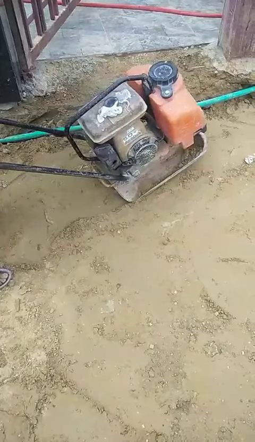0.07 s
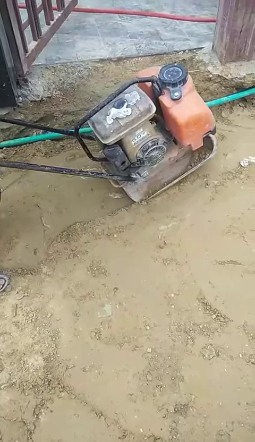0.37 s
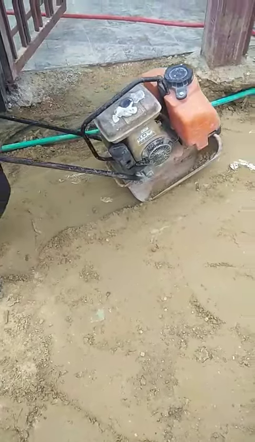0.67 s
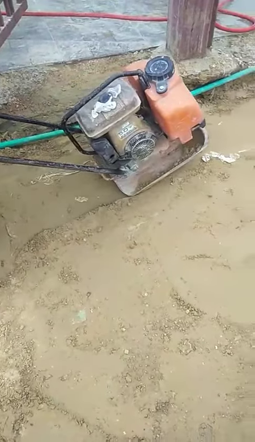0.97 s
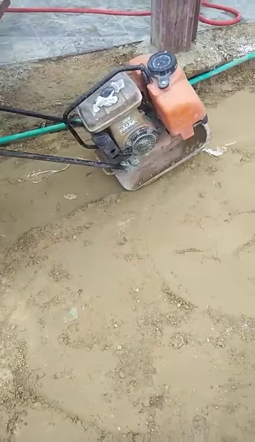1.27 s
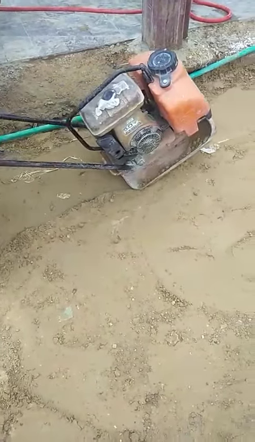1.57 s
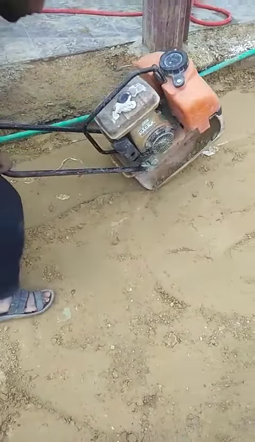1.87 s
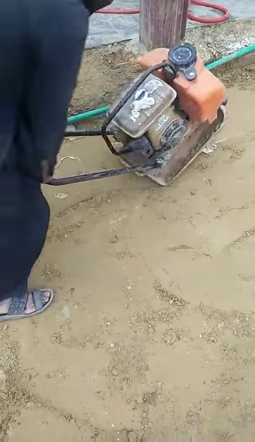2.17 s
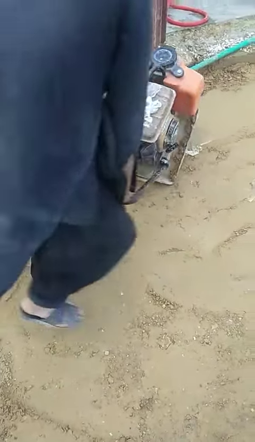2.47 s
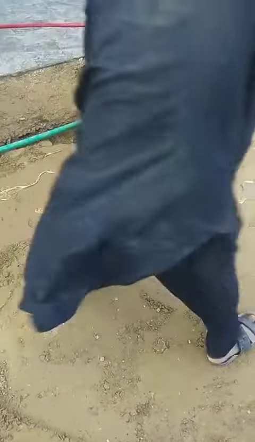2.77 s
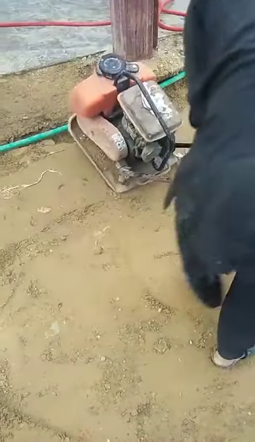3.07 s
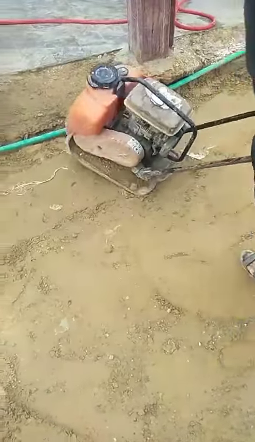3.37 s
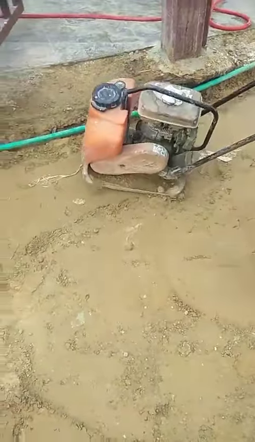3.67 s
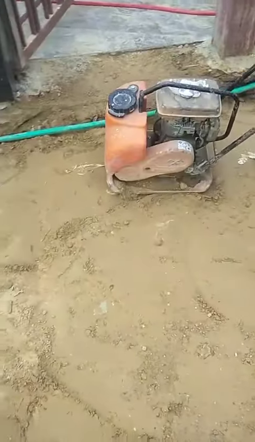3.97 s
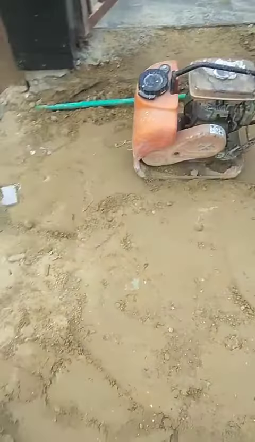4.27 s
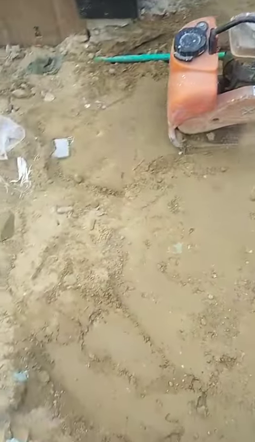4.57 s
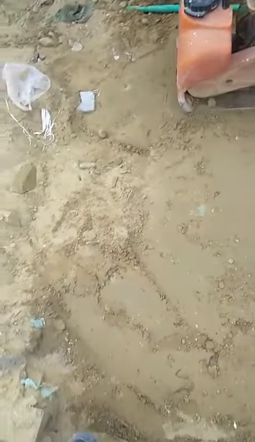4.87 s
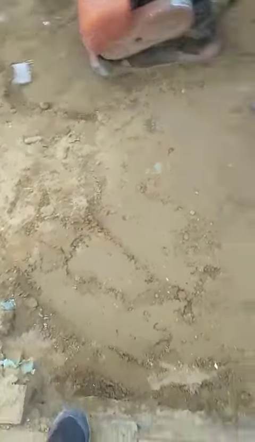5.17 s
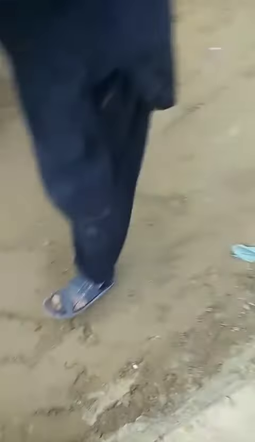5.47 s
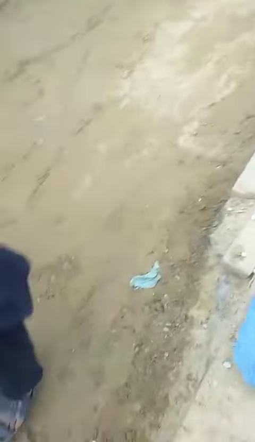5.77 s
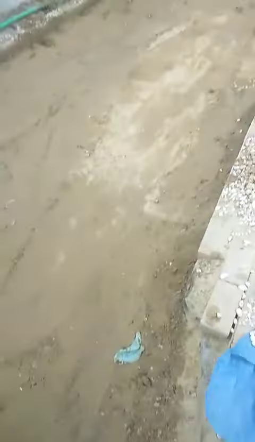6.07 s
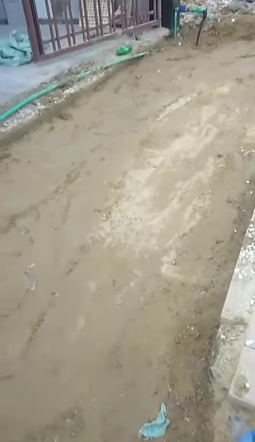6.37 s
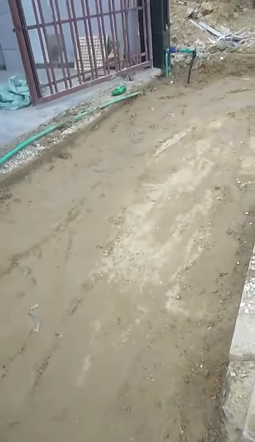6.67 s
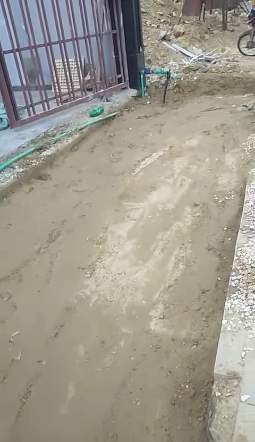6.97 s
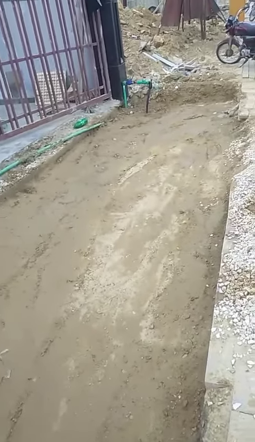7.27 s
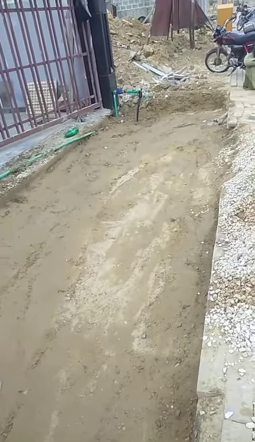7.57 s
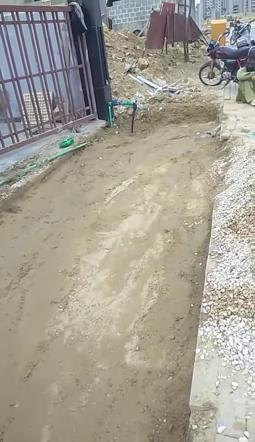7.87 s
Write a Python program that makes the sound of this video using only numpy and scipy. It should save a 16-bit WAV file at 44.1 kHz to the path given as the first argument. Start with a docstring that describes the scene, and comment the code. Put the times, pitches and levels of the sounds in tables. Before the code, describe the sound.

A petrol plate compactor runs loudly for the whole eight seconds, outdoors on damp soil, a few metres from the microphone. Its single-cylinder engine fires in a fast, steady throb, joined by a low hum from the vibrating plate that swells and sinks. The steel frame and guards rattle constantly, with a fine hiss of dancing grit. During the first two seconds the handle clanks quickly and irregularly. Around 2.5 to 3 seconds the treble dulls as someone passes in front. From about 3 to 5 seconds the machine is swung round: the exhaust grows softer, the rattle turns thinner and more ringing, and a loose piece jingles faintly until 4 seconds. The treble dips again between 5 and 6 seconds. Just after 6 seconds the exhaust swells and the handle knocks hard and buzzes, easing by about 7 seconds while the machine keeps running.

```python
"""Plate compactor on damp soil.

A petrol machine works outdoors, a few metres away, and is swung round half way. Its single cylinder
fires about 34 times a second; the belt-driven eccentric shakes the humming plate about 100 times a
second. Every shake rattles the steel frame and guards, whose colour changes with the side that faces
the listener. The handle clanks on its stops; the treble dips as the worker walks past."""
import sys
import numpy as np
from scipy import signal
from scipy.fft import rfft, irfft, next_fast_len
from scipy.io import wavfile
from scipy.ndimage import map_coordinates

SR = 44100
rng = np.random.default_rng(int(sys.argv[2]) if len(sys.argv) > 2 else 0)


def wav_record(signal):
    """Record a signal, one row per channel, as 16-bit PCM in the file named by sys.argv[1]."""
    frames = np.transpose(np.atleast_2d(signal))
    bounded = np.clip(frames, -1, 1)
    # unit amplitude maps onto the largest positive 16-bit level
    quanta = np.round(bounded * 32767).astype(np.int16)
    wavfile.write(sys.argv[1], SR, quanta)


N = 358533

# Engine speed. Each row: time in seconds, firing rate in Hz.
FIRING_HZ = [(0, 33.94), (1.6, 33.54), (2.6, 33.82), (3.5, 33.74), (4.3, 34.62), (5, 34.59), (5.5, 35.52),
             (5.95, 34.57), (7.45, 35.56), (8.13, 34.36)]
# Shaker speed, uneven as the belt slips under load. Each row: time in seconds, rate in Hz.
SHAKER_HZ = [(0, 100.7), (1.8, 99.58), (2.7, 100.82), (3.2, 99.99), (4.45, 101.45), (5.1, 99.59),
             (5.53, 94.63), (5.9, 100.13), (6.2, 98.44), (7.5, 98.32), (8.13, 103.57)]
# Side heard. Each row: time in seconds, weights of front, belt side and rear.
FACING = [(0, 0.67, 0.03, 0.2), (2.6, 0.16, 0.01, 0.095), (3.0, 0.53, 0.21, 0.61), (3.9, 0.14, 0.14, 0.084),
          (5.05, 0.066, 0.65, 0.62), (5.35, 0.37, 0, 0.016), (5.8, 0, 0.26, 0.88), (6.15, 0.22, 0, 1),
          (8.13, 0.048, 0.01, 1)]
# Exhaust as its outlet swings round. Each row: time in seconds, relative level in dB.
EXHAUST_DB = [(0, -27), (2.4, -26), (2.95, -22.5), (3.35, -31.5), (3.72, -30.5), (4.2, -36), (5.2, -34.5),
              (5.5, -30.5), (6.1, -24), (6.7, -29.5), (8.13, -30)]
# Muffler from front, belt side and rear. Each row: frequency in Hz, relative gain in dB.
MUFFLER_FRONT_DB = [(25, -56), (36, -40), (68, -16), (102, -13), (135, -6), (170, 0), (203, 1.5), (238, 2),
                    (305, -3), (338, -5), (372, -19), (405, -15), (440, -7), (473, -24), (506, -12),
                    (540, -14), (610, -23), (700, -18), (1000, -28), (3000, -55)]
MUFFLER_BELT_DB = [(25, -50), (34, -30), (68, -8), (135, -1), (200, 0), (250, -3), (345, -1), (400, -9),
                   (560, -17), (720, -17), (1000, -27), (3000, -52)]
MUFFLER_REAR_DB = [(25, -65), (34, -28), (68, -0.5), (104, -12), (138, -4.5), (174, 9.5), (245, 7.5),
                   (280, -13), (315, -6.5), (350, -3.5), (400, -40), (560, -42), (1000, -29), (3000, -52)]
# Plate hum. Each row: time in seconds, relative level in dB.
HUM_DB = [(0, -24.5), (0.75, -24.5), (1.27, -29.5), (1.7, -22), (2.3, -26), (2.75, -21), (3.0, -22),
          (3.42, -43), (3.69, -26.5), (4.1, -30.5), (4.75, -21), (5.5, -26), (5.89, -21), (6.55, -32.5),
          (7.05, -30.5), (7.7, -24), (7.97, -21.5), (8.13, -23.5)]
# Its second order, as the plate digs in or skates. Each row: time in seconds, level in dB.
OCTAVE_DB = [(0, -34.5), (2.4, -37.5), (2.8, -40), (3.4, -39), (4.3, -51), (4.65, -27.5), (5.1, -25.5),
             (5.45, -37), (5.72, -36), (5.95, -25), (6.4, -43), (6.8, -51), (7.1, -37), (7.45, -27.5),
             (7.75, -29.5), (8.13, -49)]
# Hops on firm soil, landing hard every other shake. Each row: start and end in seconds, level in dB.
HOPS = [(0.33, 0.78, -38), (0.85, 1.85, -35.5), (1.92, 2.55, -35), (2.55, 3.35, -35.5), (3.45, 4.0, -42),
        (4.25, 5.15, -41)]
# Half orders of hopping. Each row: multiple of shaker speed, relative level in dB.
HOP_ORDERS = [(1.5, -2), (2.5, -.5), (3.5, -8), (4.5, -14)]
# Pounded soil. Each row: frequency in Hz, relative gain in dB.
SOIL_DB = [(30, -22), (90, -8), (150, 2), (200, -20), (250, -1), (350, -4), (550, -8), (2000, -54)]
# Engine block and covers. Each row: frequency in Hz, relative gain in dB.
BLOCK_DB = [(30, -36), (90, 0), (200, -3.5), (410, 1.5), (550, -3.5), (720, -3.5), (950, -6.5),
            (1280, -3.5), (1600, -9.5), (2100, -4.5), (2600, -5), (3100, -5), (6000, -23.5), (16000, -58)]
# Frame resonances. Each row: frequency and width in Hz, relative gain in dB.
FRAME_MODES = [(689, 47, 9.1), (903, 80, 2.9), (2130, 27, 3.4), (2480, 13, 2.7), (2860, 29, 1)]
# Rattle of loose steel. Each row: time in seconds, relative level in dB.
RATTLE_DB = [(0, -21), (0.65, -23.5), (1.2, -21.5), (2.0, -22.5), (2.3, -20.5), (2.75, -19), (3.04, -19),
             (3.4, -25), (3.55, -20.5), (3.9, -20), (4.15, -22), (4.45, -20), (4.78, -22), (5.1, -23),
             (5.6, -21), (6.6, -24.5), (7.2, -24), (8.13, -24)]
# That steel from front, belt side and rear. Each row: frequency in Hz, relative gain in dB.
STEEL_FRONT_DB = [(200, -15), (450, -8.5), (1500, -7), (2200, 2.5), (2650, -2), (3200, 7), (3600, 0.5),
                  (4300, 5), (5200, -0.5), (6300, -2.5), (7300, 0.5), (8300, -13), (10500, -38),
                  (16000, -52)]
STEEL_BELT_DB = [(200, -34), (400, -22), (1500, -20), (2100, -9), (2600, -10), (3300, -3), (3900, 5),
                 (4500, 9.5), (5500, 6.5), (6500, 3), (7400, -1), (8300, -5.5), (10500, -54.5),
                 (16000, -47.5)]
STEEL_REAR_DB = [(200, -14), (400, -15.5), (1250, 1.5), (1700, 0.5), (2450, -11), (2750, 7), (3100, 8),
                 (3300, 1), (3550, 7.5), (4100, 4.5), (4550, 8.5), (5000, 0.5), (5300, -13), (5620, -8),
                 (5950, -9), (6290, -2), (6600, -1.5), (7000, -9.5), (7600, -26), (8230, -4.5), (8600, -12),
                 (11000, -34), (16000, -67)]
# Sand and grit dancing on the plate. Each row: frequency in Hz, relative gain in dB.
SAND_DB = [(3000, -30), (7000, -4), (9000, 1), (10500, 0), (12000, -1.5), (13700, -4), (15400, -1.5),
           (16000, -4)]
# Ground reflection. Each row: time and delay in seconds, gain from 0 to 1.
GROUND_BOUNCE = [(0, 0.00053, 0.27), (2.9, 0.00055, 0.27), (4.0, 0.00057, 0.34), (4.9, 0.00054, 0.3),
                 (5.3, 0.00032, 0.25), (5.6, 0.00037, 0.23), (6.1, 0.00014, 0.21), (8.13, 0.00019, 0.13)]
# Thin shell of the fuel tank. Each row: frequency and width in Hz, relative gain in dB.
TANK_MODES = [(1185, 18, 0.5), (1278, 16, 8.5), (1364, 13, 8), (1430, 14, -3.5), (1944, 26, -17),
              (3220, 31, -5)]
# Its ringing. Each row: time in seconds, level in dB.
TANK_DB = [(0, -29), (0.65, -73), (1.1, -31), (1.55, -34.5), (2.65, -42), (3.0, -30), (3.3, -36),
           (3.68, -34.5), (4.0, -48), (5.3, -44), (6.1, -47), (6.8, -40), (7.3, -30.5), (8.13, -31)]
# Hardest handle knocks. Each row: time in seconds, relative level in dB.
HARD_KNOCKS = [(0.0568, -8), (0.114, -13), (0.1471, -12.5), (0.166, -11), (0.187, -11), (0.215, -14),
               (0.2558, -12), (0.2743, -12), (0.3252, -12), (0.346, -13.5), (0.4045, -9.5), (0.443, -12),
               (0.4648, -11.5), (0.5237, -11), (0.555, -12.5), (0.591, -12), (0.625, -13), (0.7911, -11.5),
               (0.851, -13), (0.9213, -7), (0.96, -12.5), (1.264, -11), (1.73, -8), (1.802, -13.5),
               (1.8312, -11.5), (1.8627, -10), (1.8941, -12), (2.1236, -9.5), (2.2139, -12), (3.0505, -13),
               (6.0876, -4.5), (6.0985, -10), (6.109, -8.5), (6.1195, -10), (6.3812, -8), (6.5555, -7),
               (6.5853, -11), (6.9491, -12)]
# Knock colour. Each row: frequency in Hz, relative gain in dB.
KNOCK_DB = [(500, -20), (1300, -7), (2600, -7), (3500, -2), (4450, 0), (5500, -6), (7200, -8), (10000, -18),
            (16000, -22)]
# Handle resonances. Each row: frequency and width in Hz, relative gain in dB.
HANDLE_MODES = [(3750, 300, -5), (4480, 260, 3), (4920, 420, -2)]
# Direct path blocked, twice by the passing worker.
# Each row: start, end, closing time and clearing time in seconds, corner in Hz, treble loss in dB.
SHADOWS = [(2.36, 3.02, .32, .28, 2300, 10), (5.12, 5.56, .05, .14, 4400, 4.3),
           (5.58, 6.12, .29, .15, 2900, 12)]
# Belt guard resonances.
# Each row: frequency and width in Hz, relative level in dB, loudest time and spread in seconds.
GUARD_MODES = [(1937, 22, -32, 4.55, .5), (2070, 160, -33, 3.2, .3), (3305, 80, -34.5, 4.0, .35),
               (3500, 35, -35, 4.5, .45), (4552, 50, -38, 4.1, .5), (5107, 50, -36, 4.7, .35),
               (5400, 90, -32, 4.6, .25), (5995, 30, -36, 4.3, .35), (6560, 70, -35, 4.5, .4),
               (6937, 35, -37, 4.4, .5), (7545, 35, -38, 4.8, .45), (8300, 50, -42, 3.3, .35),
               (9400, 260, -39, 4.05, .35), (10600, 200, -45, 4.6, .35), (11350, 90, -47, 4.5, .5),
               (13130, 90, -45, 3.85, .5), (13480, 110, -42, 3.15, .3)]
# Thin loose piece of metal. Each row: frequency and width in Hz, relative level in dB.
JINGLE_MODES = [(12100, 200, -6), (12750, 200, -6), (14400, 200, -5), (14900, 200, -3), (15350, 250, -1)]
# Briefly chattering parts. Each row: start and end in seconds, frequency and width in Hz, level in dB.
FLARES = [(2.99, 3.16, 7350, 260, -27), (3.64, 3.8, 7200, 400, -30), (3.8, 4.02, 3320, 200, -31),
          (4.98, 5.15, 7400, 350, -28.5), (6.06, 6.22, 5450, 500, -27), (6.28, 6.72, 4650, 380, -28),
          (6.78, 7.1, 4620, 280, -27)]


def amp(db):
    """dB to gain."""
    return 10 ** (np.asarray(db) / 20)


def unit(x):
    """Scale to rms 1."""
    return x / np.sqrt(np.mean(x ** 2) + 1e-20)


def curves(rows):
    """Per-sample curve for each column after the time."""
    times_s, *columns = np.transpose(rows)
    return [np.interp(np.arange(N) / SR, times_s, column) for column in columns]


def spell(start_s, end_s, attack_s, release_s):
    """Trapezoid gate, 0 outside start to end."""
    t = np.arange(N) / SR
    return np.clip(np.minimum((t - start_s) / attack_s, (end_s - t) / release_s), 0, 1)


def wobble(rate_hz):
    """Smooth random curve, rate_hz knots a second."""
    grid = np.arange(0, N, 64)
    coarse = map_coordinates(rng.standard_normal(256), [grid * rate_hz / SR], mode="mirror")
    return np.interp(np.arange(N), grid, coarse)


def side_shares():
    """Front, belt side and rear weights, summing to 1."""
    sides = np.array(curves(FACING))
    return sides / sides.sum(axis=0)


def by_side(front_db, belt_db, rear_db):
    """Level in dB, blended by the side heard."""
    return np.dot((front_db, belt_db, rear_db), side_shares())


def filtered(x, response):
    """Apply a gain given as a function of Hz."""
    size = 2 * next_fast_len(N // 2 + SR // 8)
    return irfft(rfft(x, size) * response(np.fft.rfftfreq(size, 1 / SR)), size)[:N]


def lowpass(x, corner_hz, order):
    """Zero-phase low-pass, half gain at the corner."""
    return filtered(x, lambda hz: 1 / (1 + (hz / corner_hz) ** order))


def body(x, spectrum, suddenness=1, size=8192):
    """Unit-energy filter. Suddenness 1 is a sharp blow, 0 an even swell and fall."""
    hz, db = np.transpose(spectrum)
    gain = amp(np.interp(np.log(np.fft.rfftfreq(size, 1 / SR) + 1), np.log(hz), db))
    cepstrum = irfft(np.log(gain))
    cepstrum[1:size // 2] *= 2
    cepstrum[size // 2 + 1:] = 0
    minimum_phase = rfft(cepstrum).imag
    response = np.roll(irfft(gain * np.exp(1j * suddenness * minimum_phase)), size // 2)
    return signal.oaconvolve(x, response / np.linalg.norm(response))[size // 2:][:N]


def ring(x, modes):
    """Parallel resonances, at rms 1."""
    return unit(sum(amp(db) * signal.lfilter(*signal.iirpeak(hz, hz / width_hz, fs=SR), x)
                    for hz, width_hz, db in modes))


def resonance(x, hz, width_hz):
    """One resonance, at rms 1."""
    return ring(x, [(hz, width_hz, 0)])


def blows(turns, scatter_db, jitter_s):
    """One impulse per whole turn, uneven in size and time."""
    at = np.flatnonzero(np.diff(np.floor(turns)) > 0)
    size, late = rng.standard_normal((len(at), 2)).T
    at = np.clip(np.round(at + late * jitter_s * SR), 0, N - 1).astype(int)
    return np.bincount(at, amp(scatter_db * np.clip(size, -2, 2)), N)


def burst(t60_s, samples=SR // 10):
    """Envelope of a burst of contacts: fast rise, exponential decay."""
    t = np.arange(samples) / SR
    return amp(-60 * t / t60_s) * (1 - np.exp(-t / .0013))


def chatter(hits, t60_s, bed):
    """Each hit starts a dying shower of tiny contacts, over a steady bed."""
    power = np.abs(signal.oaconvolve(hits ** 2, burst(t60_s) ** 2)[:N])
    return unit(np.sqrt(power / power.mean() + bed) * rng.standard_normal(N))


def panels(hits, t60_s, states):
    """Hits ring dense sheet-steel modes for up to 0.1 s; the mix drifts as the machine moves."""
    envelope = burst(t60_s)
    length = len(envelope)
    rings = rng.standard_normal((states + 1, length)) * envelope
    out = np.zeros(N + length)
    for at in np.flatnonzero(hits):
        state, blend = divmod(at * states / N, 1)
        before, after = rings[int(state):int(state) + 2]
        out[at:at + length] += hits[at] * (np.sqrt(1 - blend) * before + np.sqrt(blend) * after)
    return unit(out[:N])


def exhaust(firings):
    """Each firing sends a pulse and a turbulent puff through the muffler; the valve opens gradually."""
    pulses = -blows(firings, scatter_db=.75, jitter_s=.00004)
    gas = unit(pulses) + amp(-43) * chatter(pulses, t60_s=.02, bed=.13)
    sides = zip(side_shares(), (MUFFLER_FRONT_DB, MUFFLER_BELT_DB, MUFFLER_REAR_DB))
    muffled = sum(share * body(gas, muffler, suddenness=.6) for share, muffler in sides)
    return amp(curves(EXHAUST_DB)[0] + 3.5) * muffled


def plate(shakes):
    """The plate pumps air at shaker speed; striking soil adds overtones, hopping adds half orders."""
    phase = 2 * np.pi * shakes
    third = amp(by_side(-11, -40, -16)) * np.cos(3 * phase)  # beats with the engine's ninth order
    hum = amp(curves(HUM_DB)[0] - 2) * (np.cos(phase) + third + amp(-24.5) * np.cos(4 * phase))
    octave = -amp(curves(OCTAVE_DB)[0]) * np.cos(2 * phase)
    hopping = sum(amp(db) * spell(start, end, attack_s=.23, release_s=.23) for start, end, db in HOPS)
    hops = hopping * sum(amp(db) * np.cos(order * phase) for order, db in HOP_ORDERS)
    landings = blows(shakes, scatter_db=2, jitter_s=.00046)
    thuds = amp(-47) * body(chatter(landings, t60_s=.017, bed=.41), SOIL_DB)
    return np.sqrt(2) * (hum + octave + hops) + thuds


def clatter(firings, shakes):
    """Combustion, piston and valves knock the block in strict time; the plate scuffs less evenly."""
    knocks = panels(blows(firings, scatter_db=2, jitter_s=.00005), t60_s=.37, states=16)
    shaken = panels(blows(shakes, scatter_db=0, jitter_s=.0005), t60_s=.068, states=20)
    scuff = chatter(blows(shakes, scatter_db=8, jitter_s=.00067), t60_s=.093, bed=1)
    uneven = amp(-1) * shaken + amp(-2) * scuff
    uneven -= .6 * lowpass(uneven, corner_hz=550, order=6)  # soil damps the lows
    drive = unit(knocks + uneven)
    metal = amp(2.5) * body(drive, BLOCK_DB) + amp(-10) * ring(drive, FRAME_MODES)
    rear = curves(FACING)[2]
    metal -= .32 * rear * lowpass(metal, corner_hz=760, order=8)  # crankcase lows carry less rearward
    effort_db = curves(EXHAUST_DB)[0] + curves(RATTLE_DB)[0]
    return amp(by_side(-28, -30.5, -27) + .24 * (effort_db - effort_db.mean())) * metal


def rattle(firings, shakes):
    """Steel and grit are thrown each shake, higher every other time; covers buzz with the crank."""
    steel_db = curves(RATTLE_DB)[0] + .66 * wobble(rate_hz=6)
    grit_db = by_side(-38, -42, -29) + steel_db - steel_db.mean()
    front, belt, rear = np.sqrt(np.clip(curves(FACING), 0, 1))
    alternation = amp(2.8 * rear * np.cos(np.pi * shakes))
    throws = blows(shakes + .15, scatter_db=1.8, jitter_s=.0006)
    covers = amp(-10.5) * blows(firings, scatter_db=8, jitter_s=.0008)
    covers += amp(-6) * blows(2 * firings + .45, scatter_db=5.5, jitter_s=.0012)
    hits = (1 - .4 * front - .3 * belt) * alternation * throws + front * covers
    strikes = panels(hits, t60_s=.041, states=20)
    afterring = amp(1) * panels(hits, t60_s=.11, states=14)
    contacts = unit(strikes + afterring + amp(11.5) * chatter(hits, t60_s=.032, bed=.38))
    steel = front * body(contacts, STEEL_FRONT_DB) + rear * body(contacts, STEEL_REAR_DB)
    steel += amp(5.5) * belt * body(contacts, STEEL_BELT_DB)
    steel /= np.sqrt(front + belt + rear)  # sides heard at once add in step
    grit = body(unit(contacts + amp(-4.5) * chatter(hits, t60_s=.015, bed=.054)), SAND_DB)
    rattling = echoes(amp(steel_db - .53) * steel + amp(grit_db) * grit)
    drive = strikes + amp(3) * chatter(hits, t60_s=.03, bed=.22)
    return rattling + belt_guard(drive) + jingle(hits) + loose_parts(drive)


def echoes(x, count=6, longest_s=.008, drift_s_per_s=.00012, gain=.14):
    """Weak, drifting reflections off frame, gate and wall: a hollow shimmer."""
    n = np.arange(N)
    late = sum(np.interp(n - far * longest_s * SR - (2 * drift - 1) * drift_s_per_s * n, n, x)
               for far, drift in rng.random((count, 2)))
    return (x + gain * late) / np.sqrt(1 + count * gain ** 2)


def ground(x):
    """A later, duller copy off the soil cuts moving notches."""
    delay_s, gain = curves(GROUND_BOUNCE)
    dull = lowpass(x, corner_hz=5500, order=4)
    late = map_coordinates(dull, [np.arange(N) - delay_s * SR], order=1)
    return (x + gain * late) / np.sqrt(1 + gain ** 2)


def tank(firings, shakes):
    """Engine and shaker keep the thin shell ringing."""
    engine = unit(blows(firings, scatter_db=1.5, jitter_s=.0001))
    shaker = chatter(blows(shakes, scatter_db=1, jitter_s=.00035), t60_s=.034, bed=.3)
    return amp(curves(TANK_DB)[0]) * ring(engine + shaker, TANK_MODES)


def handle(firings, shakes):
    """The handle hits its stops: lightly with firings, for a while at every shake, at times hard."""
    front = curves(FACING)[0]
    hits = front * amp(-25.5) * blows(firings, scatter_db=7, jitter_s=.0016)
    buzzing = spell(start_s=6.08, end_s=7.35, attack_s=.0071, release_s=.6)
    hits += amp(-15.5) * buzzing * blows(shakes + .15, scatter_db=1.8, jitter_s=.00084)
    for at_s, db in HARD_KNOCKS:
        hits[round(at_s * SR)] += amp(db - .5)
    power = np.abs(signal.oaconvolve(hits ** 2, burst(t60_s=.024, samples=SR // 20) ** 2)[:N])
    knocks = body(np.sqrt(power) * rng.standard_normal(N), KNOCK_DB)
    return knocks + amp(-7) * knocks.std() * ring(knocks, HANDLE_MODES)


def shadowed(x, top_hz=7740, top_share=.15):
    """Lows bend round an obstacle; treble is lost, a little more above top_hz."""
    for start_s, end_s, closing_s, clearing_s, corner_hz, loss_db in SHADOWS:
        blocked_db = loss_db * spell(start_s, end_s, closing_s, clearing_s)
        for shelf_hz, share in ((corner_hz, 1), (top_hz, top_share)):
            low = lowpass(x, shelf_hz, order=4)
            x = low + amp(-share * blocked_db) * (x - low)
    return x


def belt_guard(drive):
    """Each mode beams its own way and sweeps past as the machine turns."""
    t = np.arange(N) / SR
    return sum(amp(db + .5) * np.exp(-.5 * ((t - at_s) / spread_s) ** 2) * resonance(drive, hz, width_hz)
               for hz, width_hz, db, at_s, spread_s in GUARD_MODES)


def jingle(hits, wander_db=5):
    """A thin loose piece jingles during the swing; its modes come and go."""
    ticks = chatter(hits, t60_s=.012, bed=0)
    modes = sum(amp(db + wander_db * wobble(rate_hz=5)) * resonance(ticks, hz, width_hz)
                for hz, width_hz, db in JINGLE_MODES)
    return amp(-37) * spell(start_s=2.7, end_s=4.05, attack_s=.13, release_s=.35) * unit(modes)


def loose_parts(drive, ramp_s=.06):
    """Parts are caught up and chatter briefly, each at its own pitch."""
    return sum(amp(db) * spell(start_s, end_s, ramp_s, ramp_s) * resonance(drive, hz, width_hz)
               for start_s, end_s, hz, width_hz, db in FLARES)


def scene():
    """Engine and shaker, counted in running cycles, beat against each other."""
    firings = .1 + np.cumsum(curves(FIRING_HZ)[0]) / SR
    shakes = .42 + np.cumsum(curves(SHAKER_HZ)[0]) / SR
    chassis = ground(clatter(firings, shakes) + rattle(firings, shakes))
    metal = shadowed(chassis + tank(firings, shakes) + handle(firings, shakes))
    return (exhaust(firings) + plate(shakes) + metal)[None]


def record(dry):
    """The microphone rounds off peaks and limits the band."""
    ceiling, top_hz = .85, 15550
    soft = dry[0] / (1 + np.abs(dry[0] / ceiling) ** 6) ** (1 / 6)
    return filtered(soft, lambda hz: hz < top_hz)[None]


dry = scene()
out = record(dry)
wav_record(out)
```